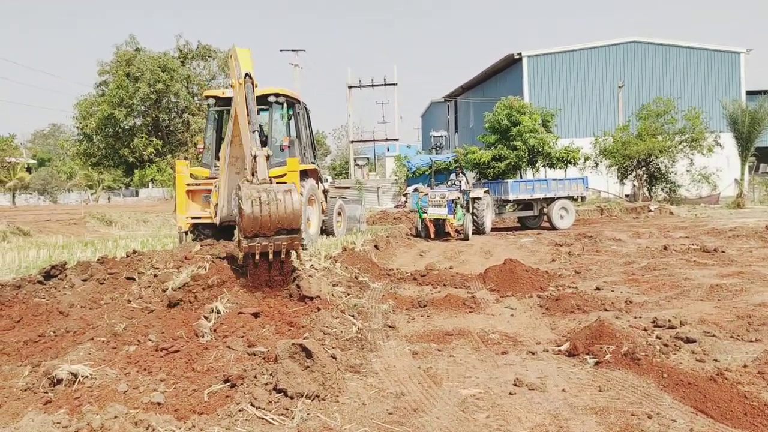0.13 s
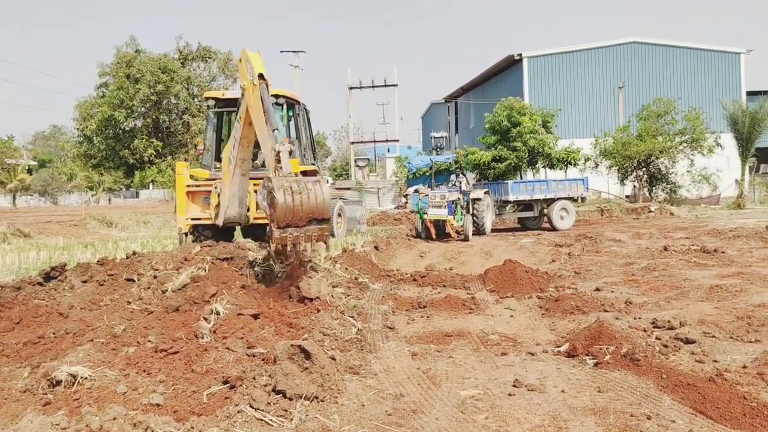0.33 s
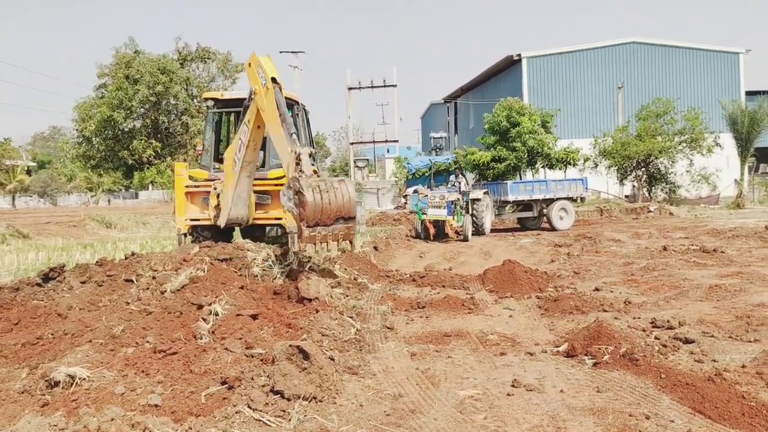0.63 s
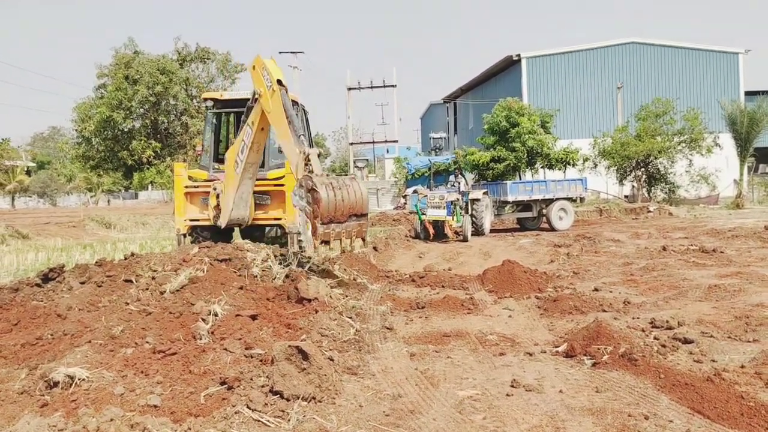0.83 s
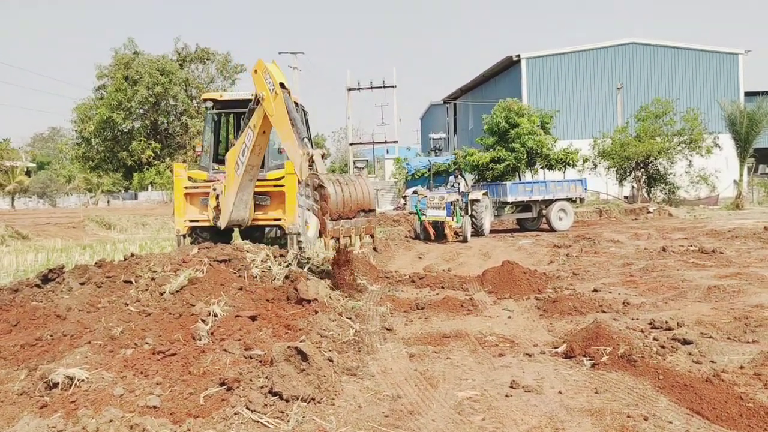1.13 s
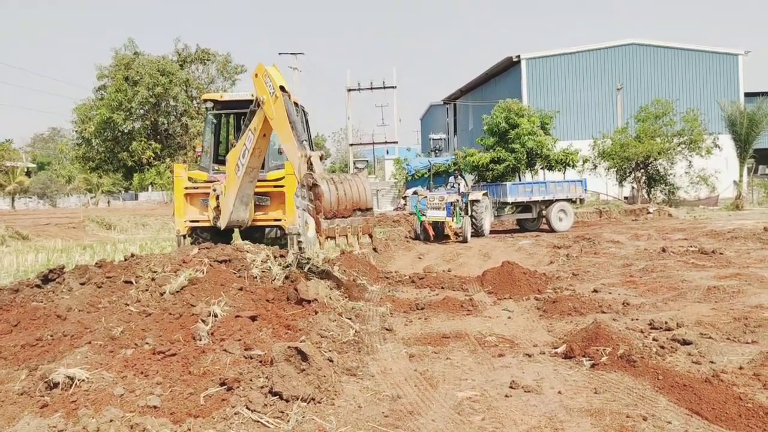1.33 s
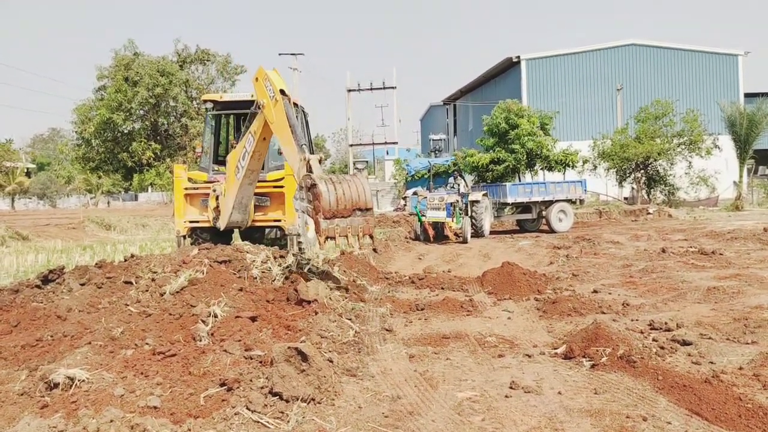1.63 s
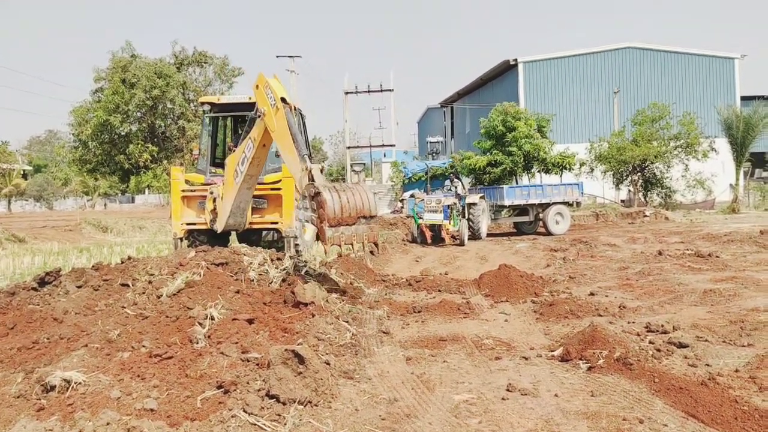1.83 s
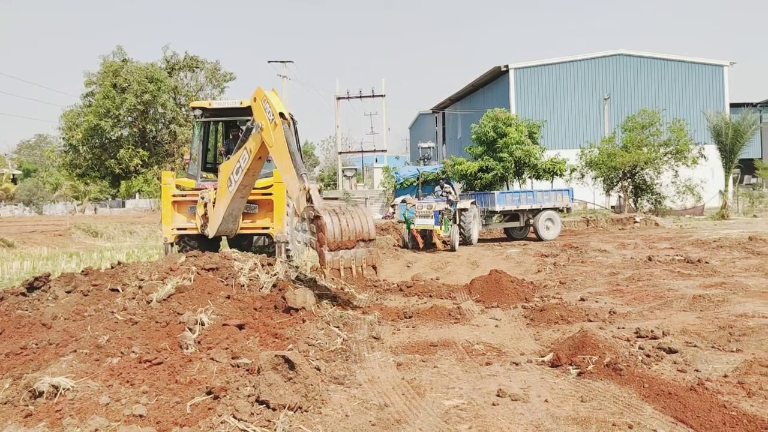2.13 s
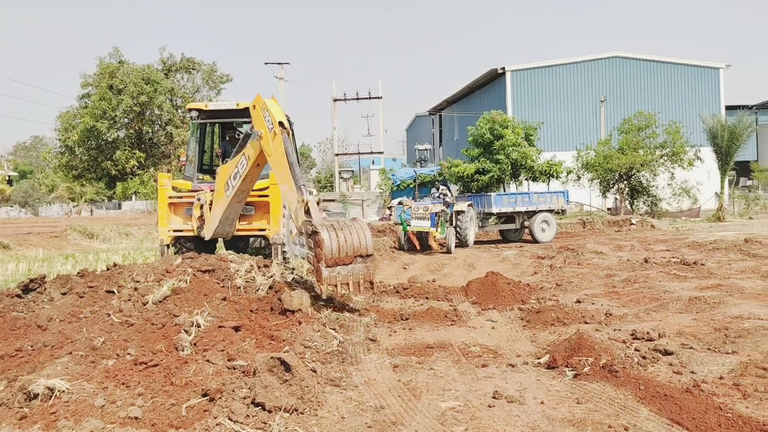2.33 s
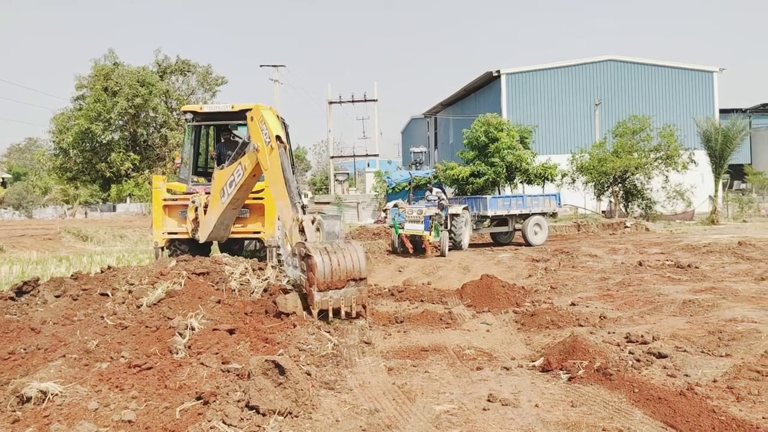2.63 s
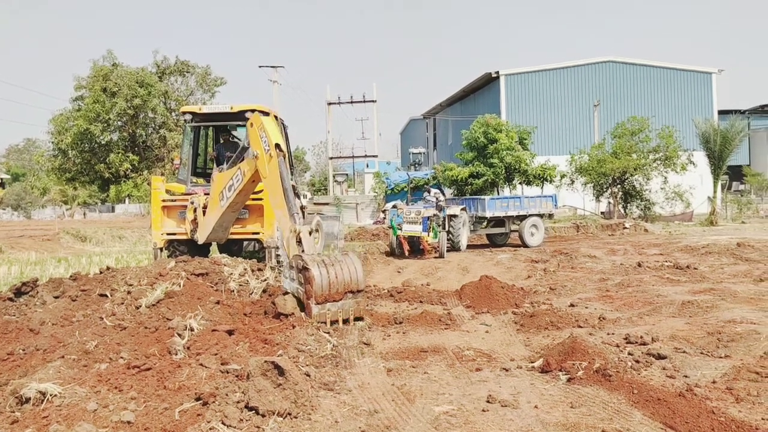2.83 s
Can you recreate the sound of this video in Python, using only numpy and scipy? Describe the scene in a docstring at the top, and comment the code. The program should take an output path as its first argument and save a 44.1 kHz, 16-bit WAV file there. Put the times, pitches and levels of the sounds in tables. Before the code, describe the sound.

On an open dirt lot, a digger engine drones with ticking and fan hiss, soil slides briefly, then the engine slows and rattles with bright metal chinks to the left before a final bucket knock; wide outdoor stereo pickup, dry.

```python
"""On an open dirt lot a backhoe loader swings its arm while a tractor idles nearby.
Both exhausts are sums of multiples of a firing rate; the backhoe pulls under load, then runs light and slows.
Its clatter, and the loose steel rattling on the left, are coloured noise under repeated blows.
The steel also chinks in short rings, the fan hisses, and the hydraulics whine faintly as wavering tones.
The bucket bumps and rings in two modes; soil slides off as swells of hiss, grit and cracks."""
import sys
import numpy as np
from scipy import signal
from scipy.fft import rfft, irfft
from scipy.io import wavfile

SR = 44100
rng = np.random.default_rng(int(sys.argv[2]) if len(sys.argv) > 2 else 0)


def persist_wave(psi):
    """Save psi, clipped to +-1, as 16-bit WAV."""
    counts = np.round(np.clip(psi, -1, 1) * 32767).astype(np.int16)
    wavfile.write(sys.argv[1], SR, np.atleast_2d(counts).T)


N = 132300
T = np.arange(N) / SR

# spectrum of the diesel clatter when running light: hz, level_db (per Hz)
CLATTER_LIGHT = [(200, 0), (370, 2), (500, -13), (700, -3), (950, 4.5), (1200, -3), (1450, 3.5),
                 (1750, -3.5), (2250, -3), (2700, -3), (3200, -19), (3750, -16.5), (6000, -18),
                 (12000, -24)]


def from_db(db):
    """Gain is the exponential of level: 20 dB for each factor of ten."""
    return 10 ** (np.asarray(db) / 20)


def in_time(rows):
    """Linear interpolation turns a table into a control curve, sample by sample."""
    return np.interp(T, *np.transpose(rows))


def at_hz(points, hz):
    """A spectrum is interpolated on a logarithmic frequency axis."""
    point_hz, value = np.transpose(points)
    return np.interp(np.log(hz + 1e-6), np.log(point_hz), value)


def pan(left_over_right_db):
    """Interaural level difference as left and right gains of mean 1."""
    gains = from_db(np.array([[left_over_right_db], [-left_over_right_db]]) / 2)
    return gains / gains.mean()


def drift(corner_hz):
    """Low-passed white noise makes a slow random fluctuation of spread 1."""
    f = np.fft.rfftfreq(N, 1 / SR)
    slow = irfft(rfft(rng.standard_normal(N)) / (1 + (f / corner_hz) ** 2), N)
    return slow / slow.std()


def colour(white, spectrum):
    """Spectral shaping and mid-side mixing of two raw signals make coloured stereo of rms 1."""
    # most alike near 250 Hz, unlike in the deepest bass and wide in the treble: hz, likeness (0-1)
    likeness = [(25, 0), (100, 0.93), (250, 1), (500, 0.6), (1000, 0.43), (2000, 0.11), (4000, 0.02),
                (12000, 0.02)]
    f = np.fft.rfftfreq(N, 1 / SR)
    alike = np.clip(at_hz(likeness, f), -1, 1)
    mid, side = rfft(white)
    stereo = np.sqrt(1 + alike) * mid + np.sqrt(1 - alike) * side * [[1], [-1]]
    # roll off beyond both ends of the table
    low_skirt = 1 / (1 + (spectrum[0][0] / 2 / (f + 1e-6)) ** 2)
    high_skirt = 1 / (1 + (f / spectrum[-1][0] / 2) ** 2)
    shaped = irfft(from_db(at_hz(spectrum, f)) * low_skirt * high_skirt * stereo, N)
    return shaped / shaped.std()


def noise(spectrum):
    """Gaussian noise through a spectrum: many small unresolved events."""
    return colour(rng.standard_normal((2, N)), spectrum)


def uneven_sizes(spread_db):
    """Impact strengths are exponentially distributed in decibels, up to three spreads."""
    return from_db(spread_db * np.minimum(rng.exponential(1, (2, N)), 3))


def crackle(spectrum, per_s, spread_db):
    """Shot noise: separate contacts of uneven size and random sign on a coloured body."""
    sizes = uneven_sizes(spread_db) * rng.choice([-1, 1], (2, N))
    return colour(sizes * (rng.random((2, N)) < per_s / SR), spectrum)


def swell(s, rise_s, decay_s):
    """Transient envelope: a Gaussian rise to 1 at time s, then an exponential decay."""
    return np.exp(-(np.minimum(T - s, 0) / rise_s) ** 2 - np.maximum(T - s, 0) / decay_s)


def cycles(rate_hz):
    """Phase is the integral of frequency; counts cycles at a slightly unsteady rate."""
    return np.cumsum(rate_hz * (1 + 0.0015 * drift(7.6))) / SR


def blows(turn, decay, depth, spread_db, attack):
    """Periodic amplitude modulation of rms 1: one uneven blow per cycle; attack and decay in cycles."""
    blow_db = spread_db * np.clip(rng.standard_normal(1000), -2, 2)
    strength = from_db(blow_db)[turn.astype(int)]
    age = turn % 1
    # the last factor brings each blow to zero before the next
    blow = (1 - np.exp(-age / attack)) * np.exp(-age / decay) * (1 - age ** 4)
    shape = 1 + depth * strength * blow / blow.max()
    return shape / np.sqrt(np.mean(shape ** 2))


def chinks(rows, rise_s, sag_hz_per_s):
    """Struck metal as short, roughened rings that may sag in pitch; rows of start_s, level_db, ring_hz."""
    out = np.zeros(N + SR)
    age = T[:SR // 40]
    envelope = age / rise_s * np.exp(1 - age / rise_s)
    for s, db, hz in rows:
        turns = hz * age - sag_hz_per_s * (age - rise_s) ** 2 / 2
        out[int(s * SR):][:len(age)] += from_db(db) * envelope * np.sin(2 * np.pi * turns)
    return out[:N] * (1 + 0.11 * drift(610))


def exhaust(turn, orders, rough):
    """Fourier series of the firing pulses: sinusoids at multiples of the firing rate, each fluttering."""
    total = 0
    for multiple, gain in orders:
        flutter = 1 + rough * drift(7.8)
        total = total + np.sqrt(2) * gain * flutter * np.sin(2 * np.pi * multiple * turn)
    return total


def backhoe_exhaust(turn, speed, load):
    """Source and filter: loaded exhaust orders glide through the pipe's response; light ones do not."""
    # exhaust orders: firing_rate_multiple, loaded_db, light_db
    order_levels = [(1, -72, -34), (1.5, -62, -54), (2, -24.5, -53), (2.5, -97, -41.5), (3, -23.5, -41),
                    (3.5, -54, -50), (4, -43.5, -52.5), (5, -39, -54), (6, -63, -66.5), (7, -60, -54.5),
                    (9, -65, -62.5), (10, -57.5, -61)]
    # response of the exhaust pipe: hz, gain_db
    pipe = [(55, -28), (70, 1), (82, -1.5), (104, 1), (116, 1.5), (126, -3.5), (140, 10.5), (152, 1.5),
            (200, -1.5)]
    pipe_delay_s, left_lead_s = 0.00505, 0.00048  # the boom reaches the left side first
    orders = []
    for multiple, loaded_db, light_db in order_levels:
        loaded = load * from_db(loaded_db + at_hz(pipe, multiple * speed))
        light = (1 - load) * from_db(light_db)
        orders.append((multiple, loaded + light))
    outlet = turn - pipe_delay_s * speed
    both_sides = np.array([outlet + left_lead_s * speed, outlet])
    rough = 0.05 + 0.21 * (1 - load) ** 2  # the unloaded engine fires less evenly
    return exhaust(both_sides, orders, rough) * pan(0.5)


def ticks(turn, load):
    """Impulse excitation: each firing under load rings the same small steel part, some harder."""
    # firings that tick harder: start_s
    hard_ticks = [.06, .17, .23, .5, .61, .71, .74, .79, .94, 1.01, 1.06, 1.12]
    tick_db, spread_db, hard_extra_db = -42.5, 1, 6.5
    tick_hz, spread_hz, rise_s = 1840, 19, 0.0034
    new_firing = np.diff(np.floor(turn), prepend=-1) > 0
    s = T[new_firing & (load > .5)]
    chance = rng.standard_normal((2, 200))[:, :len(s)]
    db = tick_db + spread_db * chance[0]
    db[[np.argmin(abs(s - hard)) for hard in hard_ticks]] += hard_extra_db
    return chinks(zip(s, db, tick_hz + spread_hz * chance[1]), rise_s, 0)


def shudder(turn):
    """Modulated shot noise: strokes of dense clacks, pulsed twice per firing."""
    # strokes of clatter as the unloaded machine shudders: peak_s, level_db
    stroke_rows = [(1.468, -39), (1.55, -43), (1.636, -35), (1.706, -39), (1.762, -38.5), (1.815, -40),
                   (1.842, -34.5), (1.89, -34), (1.949, -33.5), (2.057, -32.5), (2.147, -37),
                   (2.207, -33.5), (2.3, -38), (2.356, -36.5), (2.452, -36), (2.511, -34.5), (2.617, -37),
                   (2.668, -35.5), (2.769, -35), (2.828, -33)]
    strokes = sum(from_db(db) * swell(s, rise_s=0.01, decay_s=0.015) for s, db in stroke_rows)
    clacks = crackle(CLATTER_LIGHT, per_s=1500, spread_db=1.5)
    return strokes * clacks * blows(2 * turn, decay=0.5, depth=0.53, spread_db=1.5, attack=0.11)


def fan_hiss():
    """Broadband flow noise in four bands, each with its own amplitude fluctuation."""
    # spectrum of the fan's hiss: hz, level_db (per Hz)
    hiss_spectrum = [(300, 6), (1000, 4.5), (3000, 0.5), (4500, 1), (7000, -4), (10000, -5.5),
                     (12500, -8.5), (13800, -12), (14800, -37), (15600, -32)]
    # level of the hiss: time_s, level_db
    hiss_level = [(0, -47), (.5, -46.5), (.83, -44.5), (.92, -43), (1.13, -44), (1.4, -43.5), (1.55, -46),
                  (1.9, -43), (2.4, -43.5), (3, -42)]
    flutter_db = 1.63
    spectrum, f = rfft(noise(hiss_spectrum)), np.fft.rfftfreq(N, 1 / SR)
    edges_hz = [0, 2800, 5600, 11200, SR]
    hiss = 0
    for low, high in zip(edges_hz, edges_hz[1:]):
        band = irfft(spectrum * ((f >= low) & (f < high)), N)
        hiss = hiss + band * from_db(flutter_db * drift(27))
    return from_db(in_time(hiss_level)) * hiss


def uneven_spectrum(x):
    """Linear filtering: a few marked peaks and a dip, and a random fine unevenness of spectrum."""
    # narrow peaks and one notch in the clatter and hiss: centre_hz, width_hz, gain_db
    peaks_and_notch = [(338, 13, 6.5), (1180, 19, 3), (1458, 45, 3), (3064, 37, 6.5), (3560, 12, 2),
                       (3820, 36, 5), (5330, 35, -15)]
    uneven_db, uneven_hz = 2.04, 30.27  # spread and spacing of the random unevenness
    f = np.fft.rfftfreq(N, 1 / SR)
    unevenness = np.interp(f / uneven_hz, np.arange(2000), rng.standard_normal(2000))
    marked_db = sum(db / (1 + (2 * (f - hz) / width) ** 2) for hz, width, db in peaks_and_notch)
    return irfft(rfft(x) * from_db(marked_db + uneven_db * unevenness), N)


def backhoe():
    """Load-dependent source: loaded, the exhaust booms and ticks; light, the clatter comes in strokes."""
    # firing rate: time_s, rate_hz
    firing_rate = [(0, 34.9), (.22, 35.6), (.56, 38.37), (.95, 39.97), (1.34, 41.66), (1.63, 38.06),
                   (2.0, 37.77), (2.2, 34.33), (2.6, 33.91), (3, 33.13)]
    # load on the engine: time_s, share (0-1)
    engine_load = [(0, 0.72), (.35, 0.6), (.7, 0.78), (1.1, 0.66), (1.33, 0.7), (1.41, 0.11), (1.6, 0.02),
                   (3, 0)]
    # spectrum of the diesel clatter under load: hz, level_db (per Hz)
    clatter_loaded = [(200, -13), (260, -3), (350, 2), (470, 1.5), (620, 0.5), (770, 4), (950, -2),
                      (1200, -15), (1450, -3), (1680, -7), (2030, -1), (2500, -11), (3100, -27),
                      (6000, -22)]
    loaded_db, light_db = -41.5, -42
    speed, load = in_time(firing_rate), np.clip(in_time(engine_load), 0, 1)
    turn = cycles(speed)
    boom = backhoe_exhaust(turn, speed, load)
    knock = from_db(loaded_db) * noise(clatter_loaded)
    knock = knock * blows(turn, decay=1, depth=1.0, spread_db=0.5, attack=0.41)
    light = from_db(light_db) * noise(CLATTER_LIGHT)
    light = light * blows(turn, decay=0.32, depth=0.6, spread_db=2.5, attack=.1)
    panned = ((1 - load) * light + shudder(turn) + fan_hiss()) * pan(0.91)
    return boom + ticks(turn, load) + uneven_spectrum(np.sqrt(load) * knock + panned)


def tractor():
    """Harmonic synthesis of a steady idle: exhaust orders on a nearly constant firing rate."""
    # exhaust orders: firing_rate_multiple, level_db
    idle_orders = [(.5, -50), (1, -28.5), (1.5, -50), (2, -47.5), (2.5, -57), (3, -44), (4, -65),
                   (5, -54.5), (6, -62)]
    firing_hz = 46.12
    orders = [(multiple, from_db(db)) for multiple, db in idle_orders]
    return exhaust(cycles(firing_hz), orders, rough=.16) * pan(2.5)


def loose_steel():
    """Repeated impact: three touches per surge keep the steel ringing, and at times it strikes hard."""
    # rate at which the rattle surges: time_s, surges_per_s
    surge_rate = [(0, 10.3), (1.5, 11), (1.75, 16.2), (2.05, 19), (3, 19.3)]
    # level of the rattle: time_s, level_db
    rattle_level = [(0, -47.5), (1.1, -45.5), (1.35, -42), (1.6, -44), (2.2, -44.5), (3, -43)]
    # ring of the steady rattle: hz, level_db (per Hz)
    rattle_spectrum = [(1200, -23.5), (1850, -12), (2100, -10.5), (2300, 1), (2520, -2), (2680, -7),
                       (2900, -30), (5000, -52)]
    # hard strikes: start_s, level_db, ring_hz
    hard_chinks = [(1.316, -30, 2330), (1.339, -34, 2180), (1.465, -31, 2270), (1.553, -31.5, 2440),
                   (1.771, -31.5, 2470), (1.892, -26, 2360), (2.056, -26.5, 2378), (2.141, -22, 2220),
                   (2.173, -30, 2130), (2.208, -26.5, 2260), (2.24, -26, 2230), (2.357, -28.5, 2358),
                   (2.51, -25.5, 2360), (2.599, -30, 2160), (2.667, -25, 2395), (2.757, -30, 2126),
                   (2.824, -24, 2380), (2.86, -28, 2250), (2.892, -27.5, 2230), (2.935, -27, 2346),
                   (2.973, -29.5, 2490), (2.995, -29, 2390)]
    over_rattle_db, spread_db, pitch_range_hz = 6, 4, (2000, 2560)  # small chinks
    rise_s, sag_hz_per_s = 0.0015, 27000
    turn = 3 * cycles(in_time(surge_rate))
    level = in_time(rattle_level)
    rattle = from_db(level) * noise(rattle_spectrum)
    rattle = rattle * blows(turn, decay=0.4, depth=0.25, spread_db=1, attack=0.095)
    touches = np.flatnonzero(np.diff(np.floor(turn)))
    small_chinks = []
    for i, (size, pitch) in zip(touches, rng.random((300, 2))):
        db = level[i] + over_rattle_db + spread_db * (2 * size - 1)
        small_chinks.append((T[i], db, np.interp(pitch, [0, 1], pitch_range_hz)))
    soft = chinks(small_chinks, rise_s, sag_hz_per_s)
    hard = chinks(hard_chinks, rise_s, sag_hz_per_s)
    return (rattle + soft) * pan(26) + hard * pan(12)


def background():
    """Low-frequency random noise: ground rumble and far machinery."""
    # spectrum of the rumble: hz, level_db (per Hz)
    rumble_spectrum = [(12, 4.5), (28, 6), (45, 3), (60, -4), (110, -6), (170, -11.5), (250, -20.5),
                       (400, -24), (600, -29.5), (1500, -46)]
    return from_db(-30.5) * noise(rumble_spectrum)


def hydraulics():
    """Frequency-modulated pure tones: thin and wavering, they swell and fade."""
    # a whine, a low groan and a pin's squeak: peak_s, level_db, rise_s, decay_s, pitch_hz
    whines = [(0.27, -44.5, 0.19, 0.35, 830), (2.5, -51, 0.39, .56, 277),
              (2.985, -36.5, .003, 0.0083, 5180)]
    total = 0
    for s, db, rise_s, decay_s, hz in whines:
        total = total + from_db(db) * swell(s, rise_s, decay_s) * np.sin(2 * np.pi * cycles(hz))
    return total


def grit():
    """Randomly struck resonators: small stones tick at scattered pitches; rms 1."""
    stones_per_s, spread_db, ring_cycles = 900, 4, 8.7  # each ring falls 60 dB in ring_cycles
    out = np.zeros((2, N))
    for hz in np.geomspace(800, 11000, 14):
        hits = rng.random((2, N)) < stones_per_s / 14 / SR
        clicks = hits * uneven_sizes(spread_db)
        radius, angle = from_db(-60 * hz / ring_cycles / SR), 2 * np.pi * hz / SR
        resonator = [1, -2 * radius * np.cos(angle), radius * radius]
        out += signal.lfilter([0, np.sin(angle)], resonator, clicks + 1e-18)
    return out / out.std()


def soil_pours():
    """Granular flow: soil pours and clods burst as swells of hiss, grit and dry cracks."""
    # pours and bursts: peak_s, level_db, rise_s, decay_s
    pour_rows = [(.868, -40.5, 0.018, .019), (1.23, -42, 0.083, 0.069), (1.265, -45, .004, 0.009),
                 (1.311, -41, .003, .006), (1.317, -39, 0.0034, 0.016), (1.339, -41, .005, 0.008),
                 (1.358, -42.5, 0.008, 0.015), (1.38, -46, 0.017, 0.072), (2.195, -44, .004, 0.014)]
    # spectrum of the soil: hz, level_db (per Hz)
    soil_spectrum = [(200, 4), (900, 3), (2500, 10), (4500, 9), (7000, -1), (9500, 1), (14000, -2),
                     (16000, -18)]
    grit_db, crack_db = -4, -2  # relative to the smooth hiss
    pours = sum(from_db(db) * swell(s, rise_s, decay_s) for s, db, rise_s, decay_s in pour_rows)
    cracks = crackle(soil_spectrum, per_s=390, spread_db=1)
    soil = noise(soil_spectrum) + from_db(grit_db) * grit() + from_db(crack_db) * cracks
    return pours * soil


def bucket():
    """Modal excitation: each bump is a burst of body noise with a brief ring in two modes."""
    # bumps: peak_s, level_db, rise_s, decay_s
    bump_rows = [(.583, -36.5, .0046, .0088), (.872, -35.5, .018, 0.042), (1.32, -42, 0.17, 0.12),
                 (1.336, -37, 0.0036, 0.011), (1.379, -30.5, 0.0034, 0.014), (2.927, -33, 0.0034, 0.013),
                 (2.934, -26.5, .003, 0.0079), (2.943, -23.5, 0.0025, 0.0071), (2.959, -33, .002, .005),
                 (2.979, -31, .005, 0.02)]
    # spectrum of the bucket's body: hz, level_db (per Hz)
    body_spectrum = [(150, 5.5), (260, -17), (360, 3.5), (480, -14), (780, 2), (1170, -8.5), (1470, -8),
                     (1900, -12), (2400, -6), (3200, -21), (3800, -20), (8000, -27)]
    # ringing modes: hz, level_db (relative to the bump)
    ring_modes = [(345, -9.5), (770, -12)]
    ring_s = 0.01
    bumps, rings = 0, 0
    for s, db, rise_s, decay_s in bump_rows:
        bumps = bumps + from_db(db) * swell(s, rise_s, decay_s)
        for hz, mode_db in ring_modes:
            rings = rings + from_db(db + mode_db) * swell(s, rise_s, ring_s) * np.sin(2 * np.pi * hz * T)
    return bumps * noise(body_spectrum) + rings


def scene():
    """Linear superposition of all the sources on the open lot."""
    machines = backhoe() + tractor() + loose_steel()
    return machines + background() + hydraulics() + bucket() + soil_pours()


def record(dry):
    """Low-pass filtering: a short fade-in, then a steep cut of the top."""
    cutoff_hz, fade_s = 15700, .003
    low_pass = signal.cheby2(16, 70, cutoff_hz, fs=SR, output="sos")
    return signal.sosfilt(low_pass, dry * np.minimum(T / fade_s, 1))


dry = scene()
out = record(dry)
persist_wave(out)
```